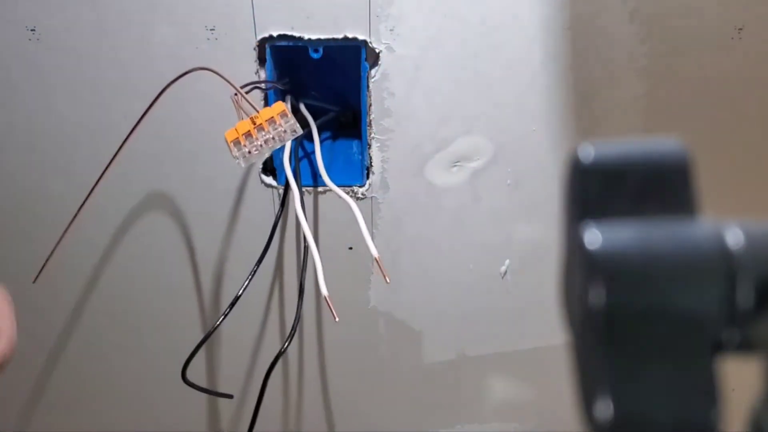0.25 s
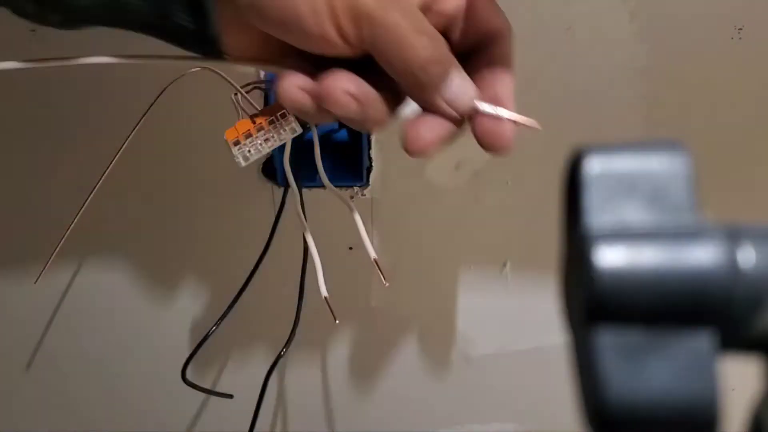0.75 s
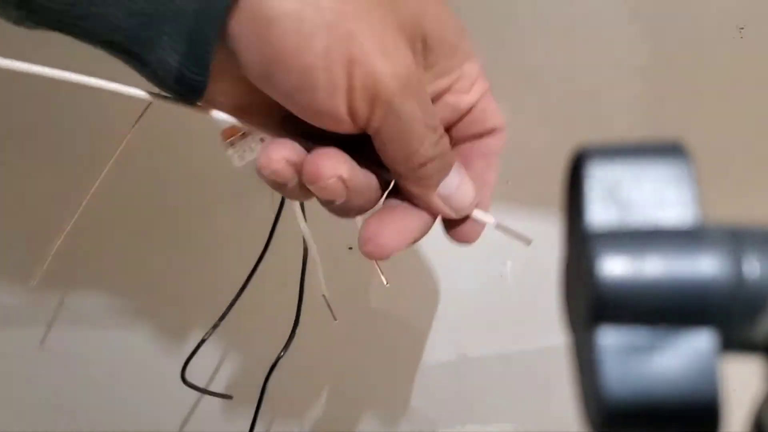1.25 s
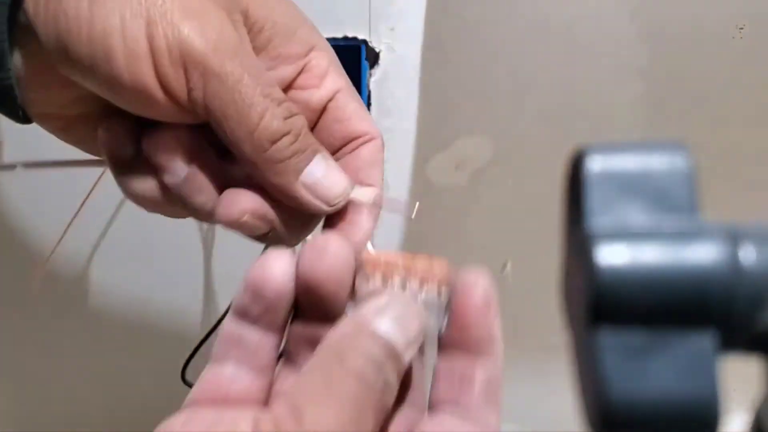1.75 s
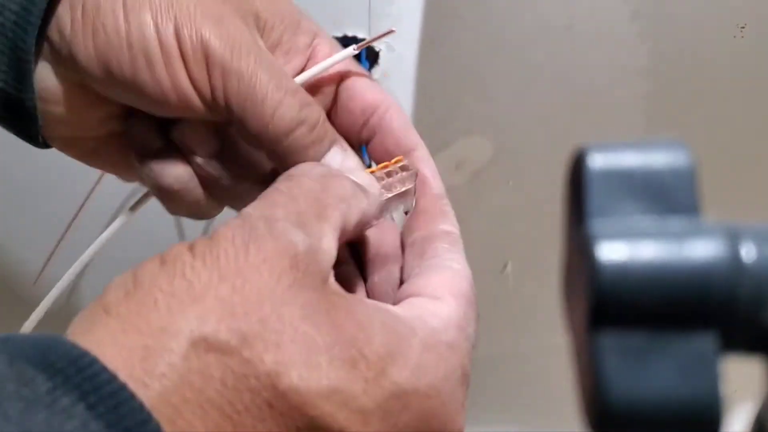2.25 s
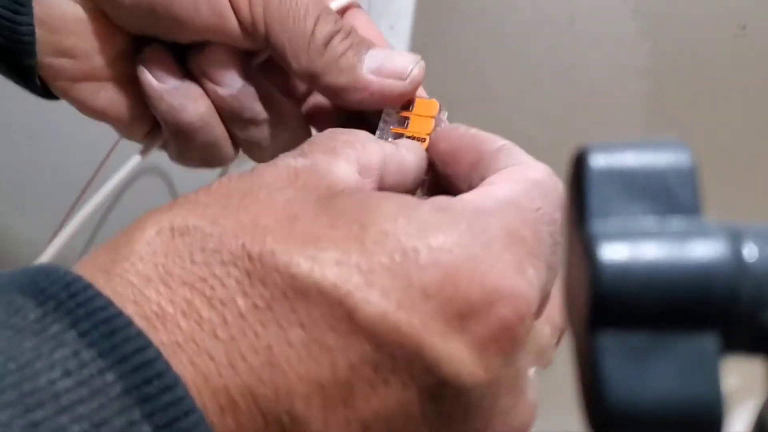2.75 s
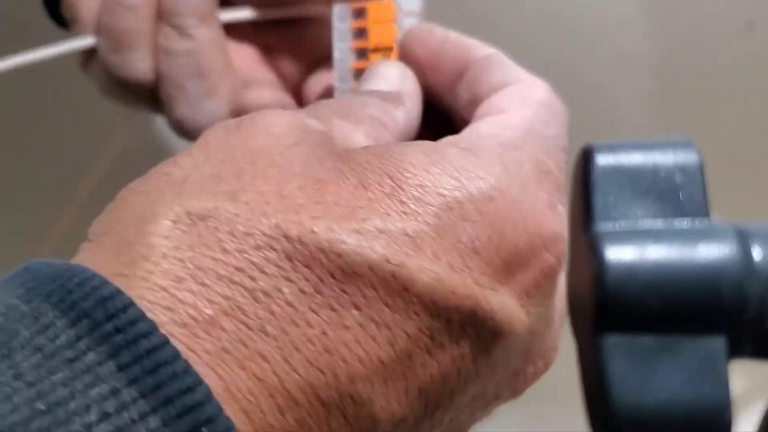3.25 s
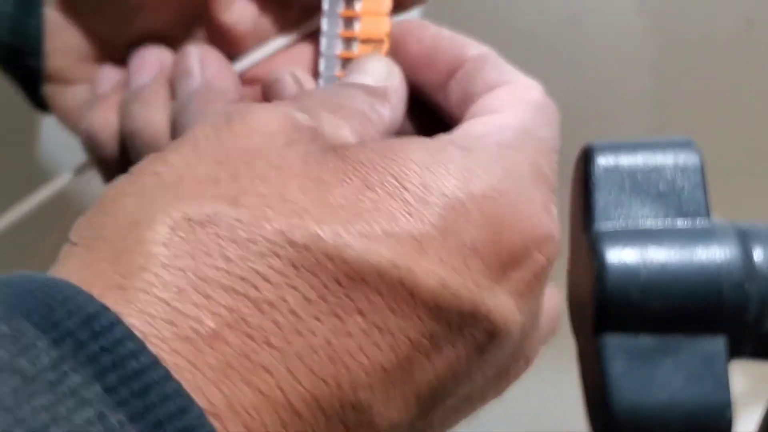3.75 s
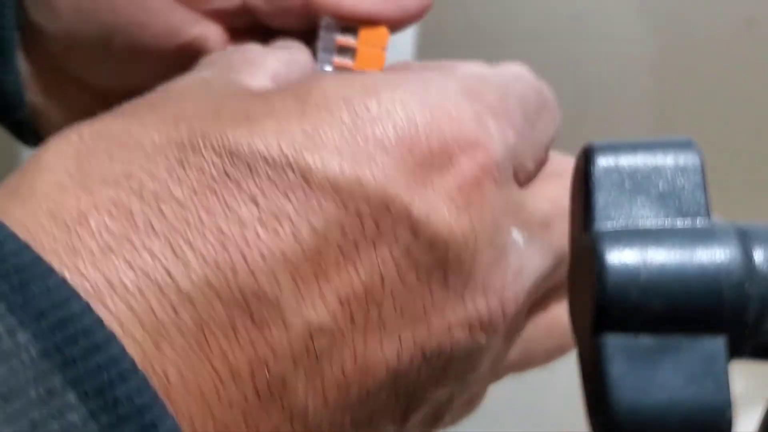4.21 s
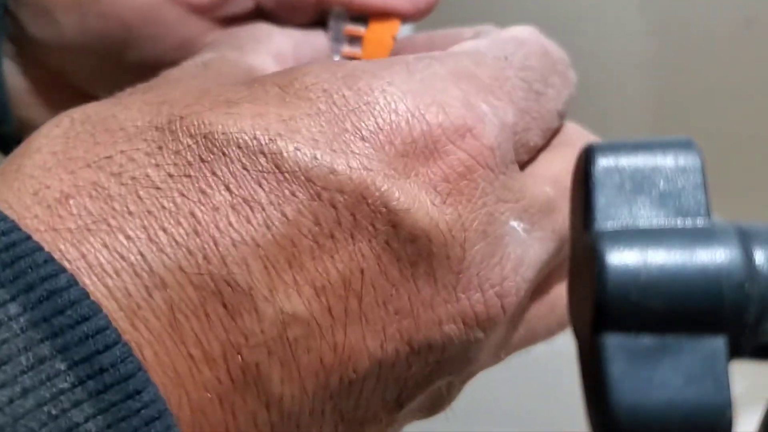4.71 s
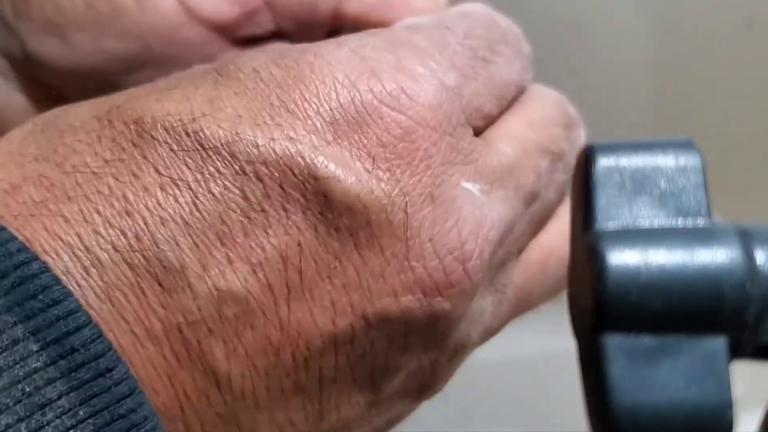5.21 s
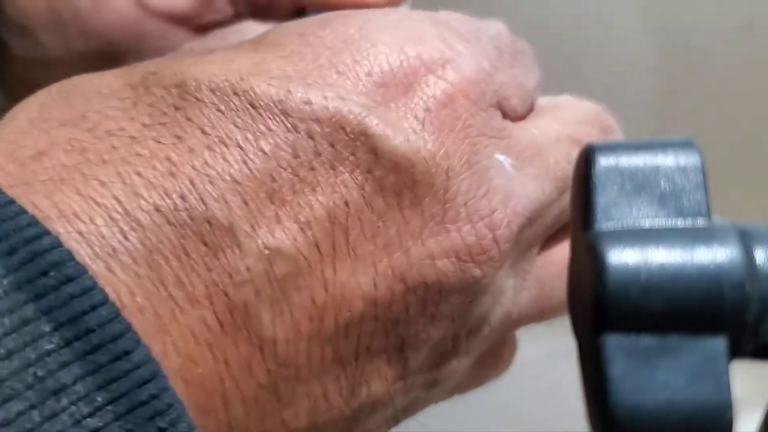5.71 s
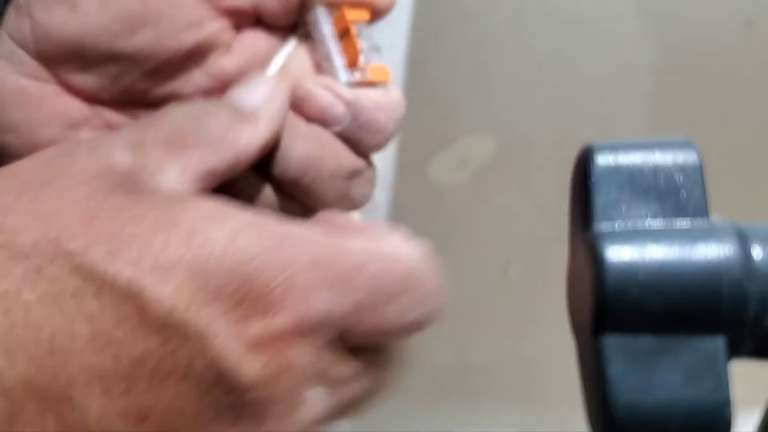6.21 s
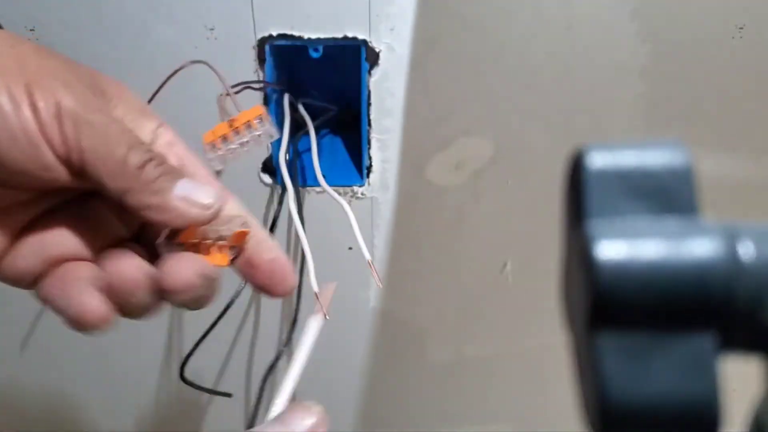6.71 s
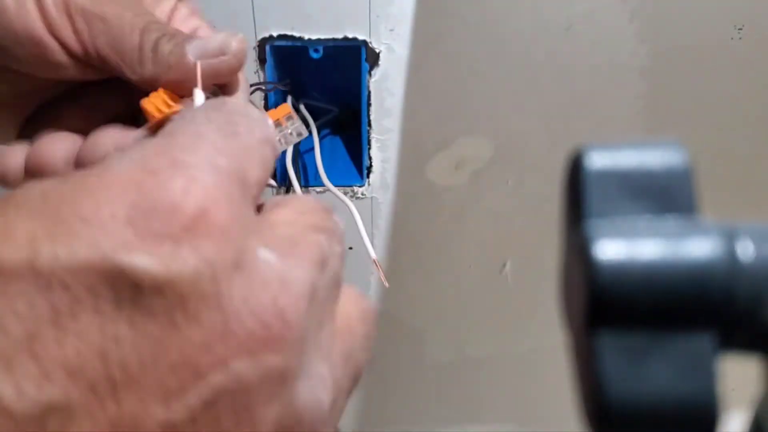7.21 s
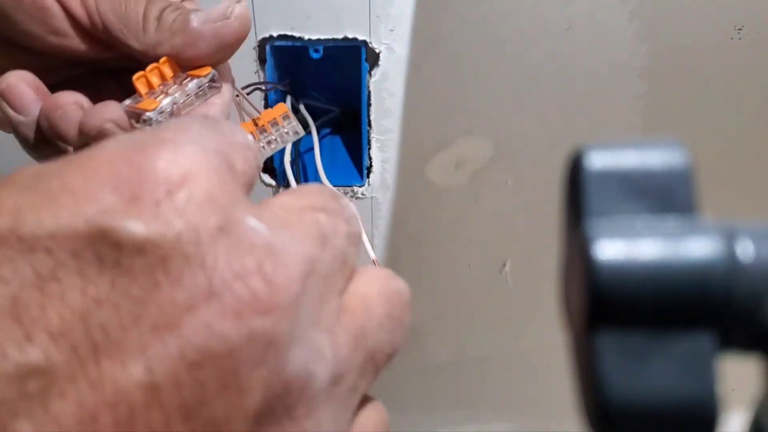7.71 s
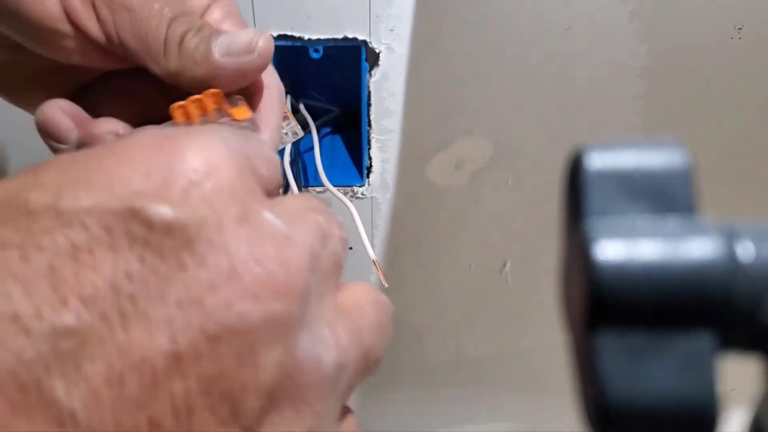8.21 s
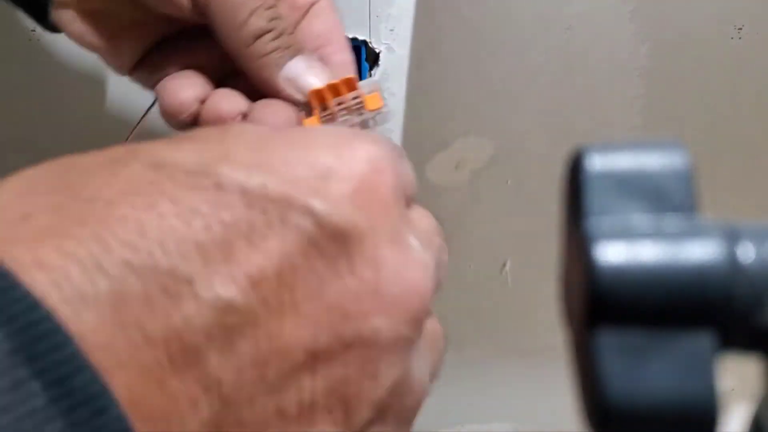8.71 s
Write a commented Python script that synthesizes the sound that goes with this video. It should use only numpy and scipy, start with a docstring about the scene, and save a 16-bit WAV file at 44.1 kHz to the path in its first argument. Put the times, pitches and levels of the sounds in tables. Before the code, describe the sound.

Hands fit stiff wires into a plastic lever connector in a bare room, with ticks, a knock, a sharp snap, rubbing and a heavy bump.

```python
"""A small bare room with a wall box: hands wire a lever connector right beside a pair of microphones.
Stiff wire ends tick and the plastic clacks as brief rings; the box takes a knock and a lever snaps shut,
both a noise crack over dying modes. Sliding, kneading and a scrape are swells of coloured noise.
Later a sleeve brushes past in short noise strokes with clicks and squeaks, and the arm bumps the stand,
a low damped swing. Echoes, a trembling rumble and steady hiss lie around it all."""
import sys
import numpy as np
from scipy import signal
from scipy.fft import rfft, irfft, next_fast_len
from scipy.io import wavfile

SR = 44100
rng = np.random.default_rng(int(sys.argv[2]) if len(sys.argv) > 2 else 0)


def to_wav(s):
    """Save 16-bit WAV."""
    ch = np.atleast_2d(s).T  # columns
    pcm = np.round(np.clip(ch, -1, 1) * 32767)  # PCM
    wavfile.write(sys.argv[1], SR, pcm.astype(np.int16))


N = 394694
TIME = np.arange(N) / SR


def amp(db):
    """Amplitude factor of a level in dB."""
    return 10 ** (np.asarray(db) / 20)


def evened(x):
    """Brings a sound to an RMS of one."""
    return x / np.sqrt(np.mean(x ** 2) + 1e-20)


def read(points, hz):
    """A spectrum joined by straight lines on a log-frequency axis."""
    f, value = np.transpose(points)
    return np.interp(np.log(hz + 1), np.log(f + 1), value)


def add(mix, start_s, sound):
    """Lays a stereo sound into the mix from start_s on."""
    part = mix[:, max(round(start_s * SR), 0):][:, :sound.shape[1]]
    part += sound[:, :part.shape[1]]


# how alike the two microphones hear a sound: pitch_hz, likeness (1 = identical)
LIKENESS = [(60, 0.97), (150, 0.96), (300, 0.97), (640, 0.42), (1400, 0.11)]


def noise(spectrum, size=N, grain_db=0):
    """Stereo noise of a given colour and an RMS of one, alike in the bass; grain_db makes it crackle."""
    hz = np.fft.rfftfreq(size, 1 / SR)
    grain_levels = grain_db * np.minimum(rng.exponential(1, size // 32 + 1), 3)
    grains = amp(grain_levels).repeat(32)[:size]
    left, other = rfft(rng.standard_normal((2, size)) * grains)
    same = np.clip(read(LIKENESS, hz), -1, 1)
    right = same * left + np.sqrt(1 - same ** 2) * other
    return evened(irfft(np.array([left, right]) * amp(read(spectrum, hz)), size))


def ring(modes, t, detune=0):
    """Dying modes; the higher ones reach the two microphones out of step."""
    hz, db, t60 = np.transpose(modes)[:, :, None]
    hz = hz * (1 + detune * rng.standard_normal(hz.shape))
    phase = np.arccos(np.clip(read(LIKENESS, hz), -1, 1)) * rng.choice([-1, 1], hz.shape) / 2
    envelope = amp(db - 60 * t / t60)
    return np.array([(envelope * np.sin(2 * np.pi * hz * t + side * phase)).sum(0) for side in (1, -1)])


def tint(x, db_at):
    """Filters x by a gain in dB that is a function of frequency."""
    size = next_fast_len(x.shape[1] + 1024)
    gain = amp(db_at(np.fft.rfftfreq(size, 1 / SR)))
    return irfft(rfft(x, size) * gain, size)[:, :x.shape[1]]


def waver(per_s):
    """Slow chance with a spread a little under one: random points joined by straight lines."""
    return np.interp(TIME * per_s, np.arange(4000), rng.standard_normal(4000))


def swell(start_s, end_s, skew=0.66):
    """A hand movement gathers speed quickly and slows to rest."""
    return np.sin(np.pi * np.clip((TIME - start_s) / (end_s - start_s), 0, 1) ** skew)


def from_left(x, lag_s):
    """Sound from the left reaches the right microphone lag_s late."""
    return np.array([x[0], np.roll(x[1], round(lag_s * SR))])


def tap(db, edge_db, fizz_db, modes, pitch, crack_db, crack_t60, detune):
    """One small contact: a noise crack and a short ring, levelled in three bands as body, edge and fizz."""
    t = TIME[:4096]
    crack = noise([(400, -8), (1000, 0.0), (4000, -3), (15000, -1.5)], size=len(t))
    crack = crack * amp(crack_db - 60 * t / crack_t60)
    hit = ring(np.multiply(modes, [pitch, 1, 1]), t, detune) + crack
    shaped = np.zeros_like(hit)
    for low_hz, high_hz, share_db in [(300, 2800, 0), (2800, 6900, edge_db), (8000, 16000, fizz_db)]:
        band = signal.butter(6, (low_hz, high_hz), "band", fs=SR, output="sos")
        shaped += amp(share_db) * evened(signal.sosfilt(band, hit))
    return amp(db) * shaped


# steady hiss of each microphone: pitch_hz, level_db (per Hz)
HISS_LEFT = [(300, -104), (700, -111), (1400, -102), (1950, -100), (2300, -114), (3400, -105), (4300, -104),
             (5200, -112), (6750, -104), (7300, -129), (15000, -122)]
HISS_RIGHT = [(300, -104), (1600, -118), (5500, -125), (8000, -128), (15000, -120)]


def hiss():
    """Steady filtered white noise, stronger in the left microphone."""
    white = rng.standard_normal((2, N)) * np.sqrt(SR / 2)
    return tint(white, lambda hz: np.array([read(HISS_LEFT, hz), read(HISS_RIGHT, hz)]))


# how long the bare room rings: pitch_hz, t60_s
ROOM_T60 = [(100, 0.2), (700, 0.8), (4000, 0.66), (15000, 0.37)]


def room(x, early_db, tail_db, early_t60=0.067):
    """Quick echoes off the wall and hands, then the noise-like tail of a bare room."""
    hz, t, cells = signal.stft(rng.standard_normal((2, SR)), SR, nperseg=256)
    fading = cells * amp(-60 * t / read(ROOM_T60, hz)[:, None])
    tail = signal.istft(fading, SR, nperseg=256)[1][:, :SR]
    t = TIME[:SR]
    tail = tail * np.clip(t / 0.0051 - .5, 0, 1)
    sparse = rng.standard_normal((2, SR)) * (rng.random((2, SR)) < 1500 / SR)  # about 1500 echoes a second
    early = sparse * (t > .002) * amp(-60 * t / early_t60)
    echoes = (amp(early_db) * evened(early) + amp(tail_db) * evened(tail)) / np.sqrt(SR)
    return x + signal.fftconvolve(x, echoes, axes=1)[:, :N]


# the hands' effort on the stiff wires, rumble_db and flutter_db still to be added: start_s, level_db
EFFORT = [(0.0, -62), (1.22, -60), (2.59, -61), (4.06, -53), (5.43, -54.5), (6.5, -57), (7.6, -61),
          (8.1, -57), (8.95, -59)]
# colours of the low rumble and of the fluttering wires: pitch_hz, level_db (per Hz, relative)
RUMBLE = [(18, -17), (42, 9), (78, 16), (125, 4), (180, -59)]
FLUTTER = [(80, -61), (125, -8.5), (165, -2.5), (260, -12.5), (420, -13), (1500, -49)]
# fingers kneading the connector and its wires, also played by kneads():
# start_s, end_s, level_db, flutter_db (wires above that level)
KNEADS = [(0.482, 0.93, -69, 7.5), (1.14, 1.643, -60.5, 8.5), (1.697, 2.365, -67.5, 4.5),
          (2.618, 2.747, -62.5, 3.5), (2.77, 3.378, -61.5, 0.5), (3.38, 3.573, -65, 3),
          (3.93, 4.3, -63, -6), (4.21, 4.45, -62.5, -6.5), (4.423, 4.84, -65.5, -5),
          (5.417, 5.805, -65.5, 10), (5.933, 6.095, -63, 1), (7.819, 7.954, -50, 5),
          (8.026, 8.331, -57.5, 15)]


def strain(rumble_db=2, flutter_db=-12, tremor_db=2):
    """Tense hands send a trembling rumble through wires and stand; the wires flutter with each squeeze."""
    effort = amp(np.interp(TIME, *np.transpose(EFFORT)))
    squeezes = sum(amp(db + above_db) * swell(start, end) for start, end, db, above_db in KNEADS)
    rumble = noise(RUMBLE) * effort * amp(rumble_db)
    flutter = noise(FLUTTER) * (effort * amp(flutter_db) + squeezes)
    return (rumble + flutter) * amp(tremor_db * waver(per_s=21))


# dull colour of the fingertips: pitch_hz, level_db (per Hz, relative)
KNEAD = [(130, -33), (300, 4), (450, -3.5), (700, -9), (1200, -19.5), (4000, -48)]
# dry fizz of skin and cloth, also played by slides(): pitch_hz, level_db (per Hz, relative)
FIZZ = [(5000, -30), (8000, -5), (15500, 2)]


def kneads(grain_db=3, grip_db=4.5, fizz_db=-19, fizz_catch_db=4):
    """Fingertips creep over the plastic in tiny dull slips, with a trace of dry skin fizz."""
    pressure = sum(amp(db) * swell(start, end) for start, end, db, _ in KNEADS)
    fizz = noise(FIZZ, grain_db=grain_db) * amp(fizz_db + fizz_catch_db * waver(per_s=11))
    return (noise(KNEAD, grain_db=grain_db) + fizz) * pressure * amp(grip_db * waver(per_s=18))


def crackle(per_s=170, spread_db=5, low_hz=1000, high_hz=6500, cycles=22, count=12):
    """Single fibres snag and flick free, each ringing briefly at one of count pitches."""
    out = np.zeros((2, N))
    for hz in np.geomspace(low_hz, high_hz, count):
        strengths = amp(spread_db * np.minimum(rng.exponential(1, N), 3))
        snags = (rng.random(N) < per_s / count / SR) * strengths
        flick = evened(ring([(hz, 0, cycles / hz)], TIME[:1024]))
        out += signal.oaconvolve(snags[None], flick, axes=1)[:, :N]
    return evened(out)


# resonances that come and go in the sliding:
# pitch_hz, half_width_hz (6 dB down), level_db (against the plain friction)
STREAKS = [(1115, 196, -7.5), (3280, 230, -5), (4490, 230, 3), (6460, 370, 4)]


def streaks(rub, drift_db=4):
    """Narrow resonances of the friction, each swelling and fading as the contact shifts."""
    out = np.zeros((2, N))
    for f, half_width, db in STREAKS:
        streak = tint(rub, lambda hz: db - 20 * np.log10(1 + ((hz - f) / half_width) ** 2))
        out += streak * amp(drift_db * waver(per_s=22))
    return out


# skin and cloth sliding, trim_db still to be added: start_s, end_s, level_db, fizz_db
SLIDES = [(0, 0.217, -55.5, -10), (0.167, 0.936, -64, -18), (1.132, 1.545, -62.5, -8),
          (6.236, 6.666, -57.5, -17.5), (6.757, 6.967, -60, -0.5), (6.894, 7.11, -53.5, 2),
          (7.13, 7.35, -52.5, -7), (7.807, 8.008, -50, -26), (8.02, 8.328, -47, -13),
          (8.492, 8.934, -54.5, -12.5)]
# colour of the friction: pitch_hz, level_db (per Hz, relative)
SLIDE = [(150, 4.5), (350, 0.5), (1300, -5), (2500, -8), (6500, -14), (8500, -24)]


def slides(trim_db=2, grain_db=3, catch_db=2.5, crackle_db=-14, edge_share=0.55, even_fizz_db=-10):
    """Skin and cloth slide in grainy, catching friction; fizzier slides have more edge and crackle."""
    rub, fizz = noise(SLIDE, grain_db=grain_db), noise(FIZZ, grain_db=grain_db)
    body = tint(rub, lambda hz: read([(1200, 0.5), (3500, -13)], hz))
    edge = rub - body + streaks(rub) + amp(crackle_db) * crackle()
    out = np.zeros((2, N))
    for start, end, db, fizz_db in SLIDES:
        edge_gain = amp(edge_share * (fizz_db - even_fizz_db))
        out += amp(db) * swell(start, end) * (body + edge_gain * edge + amp(fizz_db) * fizz)
    return out * amp(trim_db + catch_db * waver(per_s=90))


# colour of a wire pushed along the connector: pitch_hz, level_db (per Hz, relative)
SCRAPE = [(500, -1.5), (850, 2), (1400, -7), (2600, -9.5), (3600, -1.5), (8500, -25)]


def scrape(start_s=7.44, end_s=7.85, level_db=-57.5, grain_db=2):
    """Wire insulation glides over plastic in one soft, airy swell."""
    return amp(level_db) * noise(SCRAPE, grain_db=grain_db) * swell(start_s, end_s)


# soft bumps of hand and arm: start_s, level_db, pitch_hz
BUMPS = [(0.003, -41.5, 171), (0.26, -40, 52), (0.905, -38.5, 68.6), (1.354, -35.5, 93),
         (2.63, -39.5, 92.6), (7.667, -33.5, 151), (7.764, -33.5, 151), (7.860, -25, 150),
         (8.176, -15, 158), (8.188, -17.5, 137)]
# the stand's own ringing, before each bump weights it: pitch_hz, level_db, t60_s
STAND = [(213.3, -14, 0.21), (288, -11.5, 0.19)]
# a harder push keeps the arm on the stand and damps it:
# ring time of a push of BUMP_DB, halved every DAMPING_DB above it
BUMP_T60_S, BUMP_DB, DAMPING_DB = 0.14, -27.5, 12


def bumps(rise_s=0.00092, thud_db=-12, full_ring_hz=150):
    """Pushes shake the stand: a damped swing and a dull thud; higher-pitched ones ring the stand more."""
    out, t = np.zeros((2, N)), TIME[:16384]
    for s, db, hz in BUMPS:
        t60 = BUMP_T60_S * 2 ** ((BUMP_DB - db) / DAMPING_DB)
        thud = noise([(hz / 2, -20), (hz, 0), (2 * hz, -3), (4 * hz, -22), (30 * hz, -65)], size=len(t))
        thud = thud * amp(thud_db - 60 * t / t60)
        stand = min(hz / full_ring_hz, 1) ** 2 * ring(STAND, t)
        push = (ring([(hz, 0, t60)], t) + stand + thud) * (1 - np.exp(-t / rise_s))
        # little sound radiates below the swing
        low_cut = signal.butter(2, 0.7 * hz, "high", fs=SR, output="sos")
        add(out, s, amp(db) * signal.sosfilt(low_cut, push))
    return out


def hollow_note(t, start_hz=1100, end_hz=820, fall_s=0.035, width_hz=130):
    """The hollow between sleeve and microphone sounds a fuzzy note that falls as the arm moves off."""
    hz = end_hz + (start_hz - end_hz) * np.exp(-t / fall_s)
    low_pass = signal.butter(2, width_hz / 2, fs=SR, output="sos")
    blur = signal.sosfilt(low_pass, rng.standard_normal((2, SR)))[:, -len(t):]
    turn = 2 * np.pi * np.cumsum(hz) / SR
    return evened(blur[0] * np.cos(turn) + blur[1] * np.sin(turn))


# quick strokes of the sleeve, trim_db still to be added:
# start_s, level_db, hold_s, hollowness_db, treble_db, pitch (factor on the gap's resonances)
BRUSHES = [(6.386, -48, 0.025, -6, -4, 0.94), (6.429, -45, 0.017, -9, 2, 0.87),
           (6.5605, -36, 0.032, 6, 11, 1.1), (6.566, -33.5, 0.0074, 7, 7, 1),
           (6.921, -47, 0.031, 3, -13, 1.12), (7.157, -48.5, 0.01, -3, 3.5, 1.04),
           (7.189, -46, 0.034, 2, 3, 0.88), (7.245, -50, 0.024, 3, 7, 0.97),
           (8.209, -41.5, 0.033, -19, 10, 1.2), (8.250, -40, 0.021, -16, 10, 1.57)]
# colour of the cloth: pitch_hz, level_db (per Hz, relative)
BRUSH = [(470, -22), (800, -13), (2300, -0.5), (6500, -5.5), (7600, -13), (10000, -15.5), (15500, -11)]
# resonances of the gap between arm and microphone, before the pitch factor: pitch_hz, width_hz, lift_db
GAP = [(1210, 140, 6), (2450, 660, 4), (6630, 220, 7), (8700, 540, 11.5), (9600, 250, 11),
       (11000, 640, 9.5), (13080, 160, 7)]
# every stroke starts alike; its release, given for a hold of BRUSH_HOLD_S, grows with the root of the hold
BRUSH_RISE_S, BRUSH_T60_S, BRUSH_HOLD_S = 0.0013, 0.098, 0.016


def brushes(grain_db=3, trim_db=1, hollow_db=-17, hollow_t60=0.34, catch_db=1.5):
    """Cloth ribs catch in quick strokes, coloured by the gap at the microphone; a hollow note lingers."""
    out, t = np.zeros((2, N)), TIME[:12288]
    for s, db, hold, cupped_db, treble_db, pitch in BRUSHES:
        colour = [(1400, cupped_db), (2600, 0), (10000, treble_db)]

        def gap_db(hz):
            lifts = sum(lift / (1 + (2 * (hz - f * pitch) / width) ** 2) for f, width, lift in GAP)
            return read(colour, hz) + lifts

        fibres = tint(noise(BRUSH, size=len(t), grain_db=grain_db), gap_db)
        t60 = BRUSH_T60_S * np.sqrt(hold / BRUSH_HOLD_S)
        stroke = evened(fibres) * amp(-60 * np.maximum(t - BRUSH_RISE_S - hold, 0) / t60)
        hollow = hollow_note(t) * amp(hollow_db + cupped_db - 60 * t / hollow_t60)
        add(out, s, amp(db + trim_db) * (stroke + hollow) * np.minimum(t / BRUSH_RISE_S, 1))
    return out * amp(catch_db * waver(per_s=190))


# the cuff clicking against the microphone's housing, click_db still to be added:
# start_s, level_db, brightness_db
CLICKS = [(6.357, -45, -24), (6.925, -43.5, -25), (6.9419, -33.5, -12), (7.0027, -35, -28),
          (7.1287, -49, 0), (7.2007, -43.5, -5), (7.214, -38, -9), (7.245, -40, -15), (8.1765, -39.5, -23),
          (8.1991, -40, -13)]
# modes of the housing, before a pitch factor and detuning: pitch_hz, level_db, t60_s
HOUSING = [(770, -5.5, 0.038), (1120, 0, 0.03), (1308, -2.5, 0.027), (2905, -6, 0.02), (5450, -7, 0.012)]
# cloth ribs catching and skipping with a brief squeak, skip_db still to be added:
# start_s, level_db, brightness_db, pitch (factor on the modes)
SKIPS = [(6.3997, -44, -9, 1.02), (6.4344, -40.5, -3, 1), (6.447, -41.5, 1, 1), (6.4598, -43.5, -3, 1),
         (8.21, -49.5, 9.5, 0.94), (8.22, -55, 11, 0.945)]
# modes of the squeak, before pitch factor and detuning: pitch_hz, level_db, t60_s
SKIP = [(2467, 8, 0.038), (6740, -6, 0.041), (8820, -6.5, 0.062), (11630, 0.5, 0.06), (14900, -1, 0.068)]


def cuff(click_db=-11, skip_db=-11, click_edge_db=4, click_edge_share=0.67, skip_edge_db=-1, skip_edge_share=0.57):
    """Dry clicks and squeaky skips of the cuff, right at the microphone, as short rings with a crack."""
    out = np.zeros((2, N))
    for s, db, bright_db in CLICKS:
        edge_db = click_edge_db + click_edge_share * bright_db
        add(out, s, tap(db + click_db, edge_db, bright_db, HOUSING, 0.99,
                        crack_db=4.5, crack_t60=0.035, detune=0.045))
    for s, db, bright_db, pitch in SKIPS:
        edge_db = skip_edge_db + skip_edge_share * bright_db
        add(out, s, tap(db + skip_db, edge_db, bright_db, SKIP, pitch,
                        crack_db=0.0, crack_t60=0.022, detune=0.004))
    return out


# wire ends tapping the wall and connector, trim_db still to be added: start_s, level_db, brightness_db
WIRE_TAPS = [(0.3814, -45, -7.5), (0.5075, -45, -46), (0.582, -49, -16), (0.596, -43.5, -20),
             (0.732, -41, -30), (1.294, -53, -6), (1.3172, -44, -28), (1.545, -57, -10),
             (1.629, -57.5, -11), (1.7419, -43.5, -9), (2.652, -61.5, -7.5), (3.32, -65, -1),
             (3.453, -64, -5.5), (3.513, -61.5, -15), (4.986, -59.5, -18), (5.057, -61.5, -18),
             (5.529, -61, -7), (5.543, -55, -24), (6.5232, -52, 1), (7.7842, -39.5, -19),
             (8.355, -52.5, 5.5)]
# modes of a wire end, before a pitch factor and detuning: pitch_hz, level_db, t60_s
WIRE = [(1136, -7, 0.057), (1670, -3, 0.014), (2050, -11, 0.025), (3597, 9.5, 0.017), (6640, -0.5, 0.024)]


def wire_taps(trim_db=-10, edge_db=0, edge_share=0.32):
    """Wire ends tick; their edge grows with the brightness of the contact."""
    out = np.zeros((2, N))
    for s, db, bright_db in WIRE_TAPS:
        add(out, s, tap(db + trim_db, edge_db + edge_share * bright_db, bright_db, WIRE, 0.96,
                        crack_db=7.5, crack_t60=0.041, detune=0.031))
    return out


# hollow plastic clacks of the connector, trim_db still to be added:
# start_s, level_db, brightness_db, pitch (factor on the modes)
CLACKS = [(1.361, -43.5, -42, 0.98), (1.398, -35, -29, 0.99), (1.4518, -42.5, -40, 0.94),
          (1.497, -46.5, -36, 1), (2.864, -56, -32, 1), (2.902, -62, -34, 1), (5.630, -49.5, -28, 0.58),
          (8.801, -46, -32, 0.55)]
# modes of the plastic, before pitch factor and detuning: pitch_hz, level_db, t60_s
PLASTIC = [(409, -5, 0.088), (853, 5.5, 0.039), (1122, -4, 0.04), (1882, 3, 0.03), (2280, 2, 0.022),
           (6240, -5, .03)]


def clacks(trim_db=-11, edge_db=6, edge_share=0.69):
    """The plastic clacks higher or lower with the grip on it."""
    out = np.zeros((2, N))
    for s, db, bright_db, pitch in CLACKS:
        add(out, s, tap(db + trim_db, edge_db + edge_share * bright_db, bright_db, PLASTIC, pitch,
                        crack_db=5.5, crack_t60=0.047, detune=0.009))
    return out


def snap(start_s, modes, crack, ring_db, crack_db, crack_t60, rise_s=0.00051):
    """A hard blow: a broad crack over the modes of the struck thing, softened by the contact time."""
    out, t = np.zeros((2, N)), TIME[:16384]
    burst = noise(crack, size=len(t)) * amp(crack_db - 60 * t / crack_t60)
    blow = amp(ring_db) * ring(modes, t) + burst
    add(out, start_s, blow * (1 - np.exp(-(t / rise_s) ** 2)))
    return out


# modes of the wall box, before ring_db: pitch_hz, level_db, t60_s
BOX = [(92, -8, 0.44), (169.4, 2, 0.35), (219.4, -1, 0.21), (395.5, 4, 0.11), (648, -7, 0.11),
       (713, -7, 0.13), (444, -2, 0.22), (1090, -2, 0.09), (2244, -1, 0.045), (3420, -4, 0.08)]
# the crack at the start of the knock: pitch_hz, level_db (per Hz, relative)
BOX_CRACK = [(80, -5), (450, 13), (1500, -4), (3200, -6), (6500, -19), (9000, -39.5)]


def box_knock():
    """The box takes a knock and rings on its modes."""
    return snap(0.96, BOX, BOX_CRACK, ring_db=-32.5, crack_db=-25.5, crack_t60=0.14)


# modes of the lever, before ring_db: pitch_hz, level_db, t60_s
LEVER = [(75.8, -7.5, 0.43), (165.2, -0.5, 0.21), (209, -2.5, 0.14), (380, -6.5, 0.16), (678, -2, 0.06),
         (1058, -4.5, 0.056), (1700, -8.5, 0.043), (2770, -12, 0.038), (2770, -22, 0.3), (3240, -19, 0.3),
         (3670, -19, 0.27)]
# the crack as it shuts: pitch_hz, level_db (per Hz, relative)
LEVER_CRACK = [(80, 4), (250, 4), (600, -10), (3400, -3), (6500, -12), (9000, -36)]


def lever_snap():
    """The lever snaps shut with a short crack over its modes."""
    return snap(5.3355, LEVER, LEVER_CRACK, ring_db=-30.5, crack_db=-27.5, crack_t60=0.062)


# balance of the microphone pair: pitch_hz, level_db (gain of left minus right)
LEAN = [(60, 0.5), (700, 4), (1300, 4), (2400, 5), (6500, 6), (8000, -0.5), (15000, -5)]


def scene():
    """Blows at the wall get more room tail; rubbing beside the microphone stays drier."""
    wall = room(wire_taps(), early_db=-9.0, tail_db=-7)
    wall += room(clacks(), early_db=-8, tail_db=-13)
    wall += room(box_knock() + lever_snap(), early_db=-15.5, tail_db=-7.5)
    sleeve = from_left(brushes() + cuff() + slides() + scrape(), lag_s=.0003)
    near = room(sleeve, early_db=-10.0, tail_db=-13.5)
    near += room(bumps(), early_db=-22, tail_db=-10)
    near += strain() + kneads()
    sound = from_left(wall + near, lag_s=.00006)
    return tint(sound, lambda hz: np.outer([.5, -.5], read(LEAN, hz))) + hiss()


def record(dry, edge_hz=15850):
    """The band limit of the recorder: a steep low-pass at edge_hz."""
    low_pass = signal.firwin(511, edge_hz, window=("kaiser", 9), fs=SR)
    return signal.oaconvolve(dry, low_pass[None], "same")


dry = scene()
out = record(dry)
to_wav(out)
```